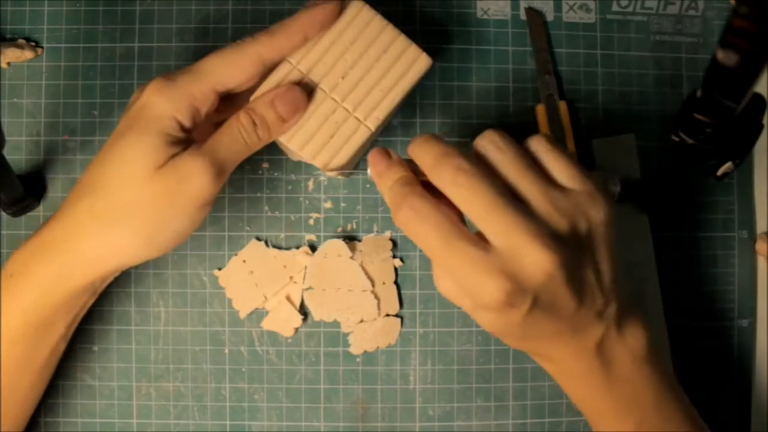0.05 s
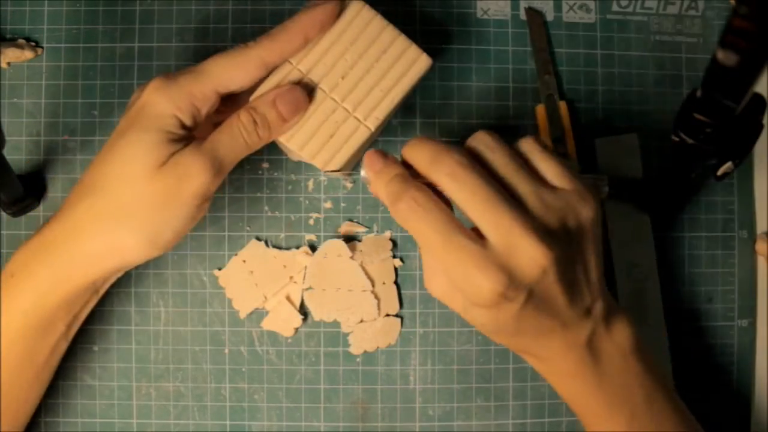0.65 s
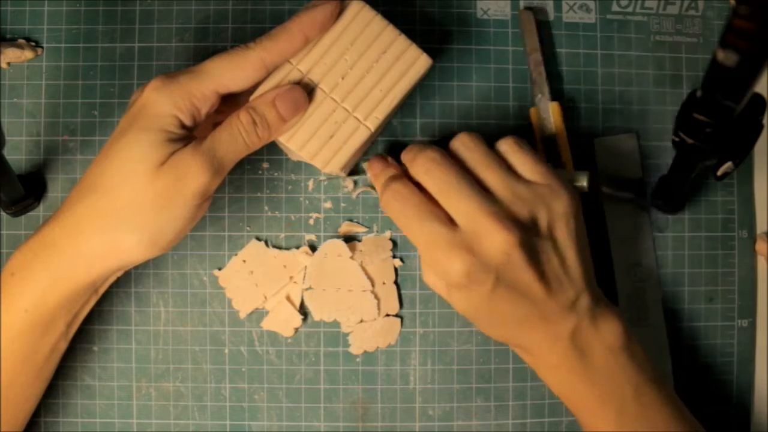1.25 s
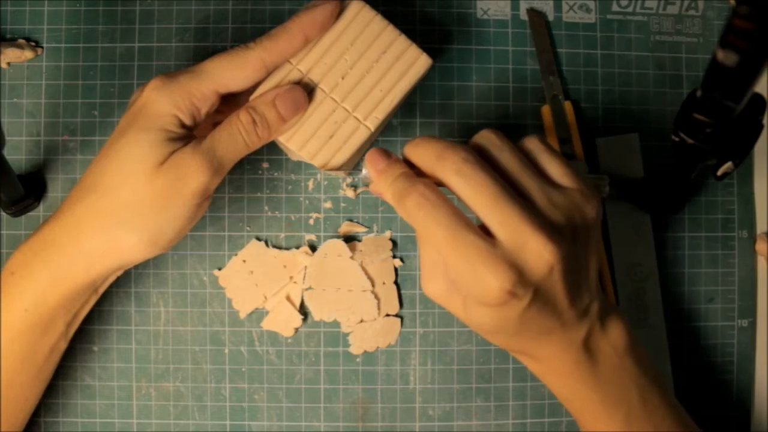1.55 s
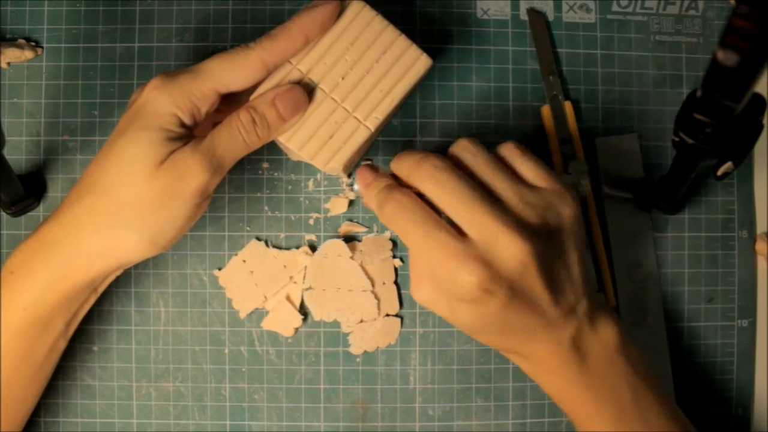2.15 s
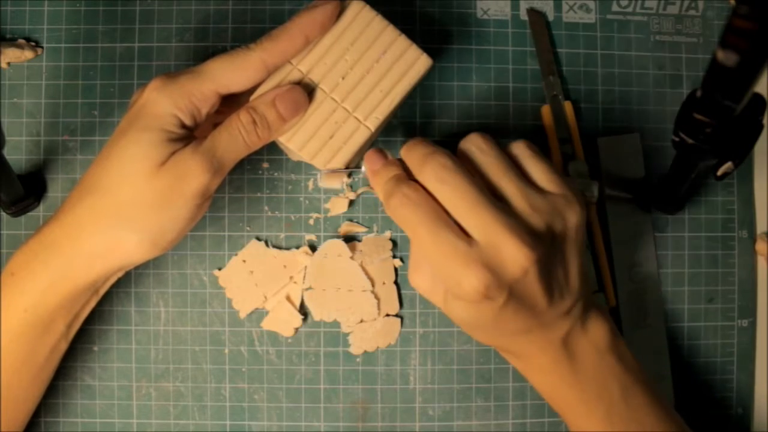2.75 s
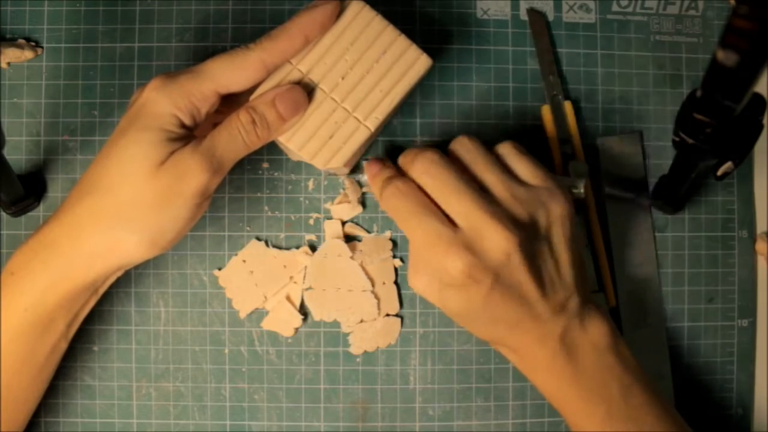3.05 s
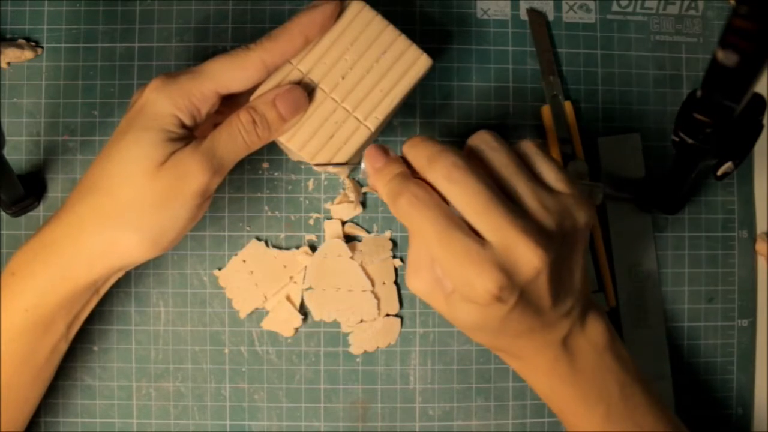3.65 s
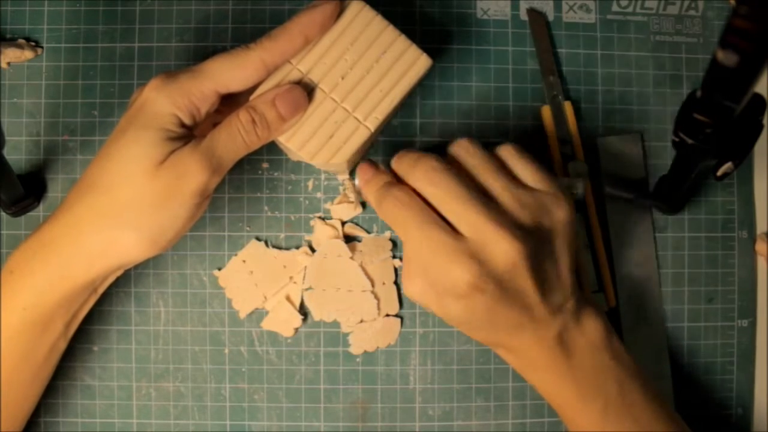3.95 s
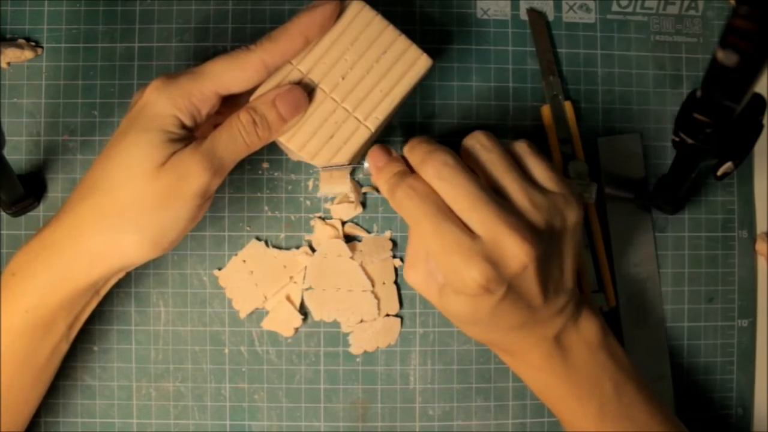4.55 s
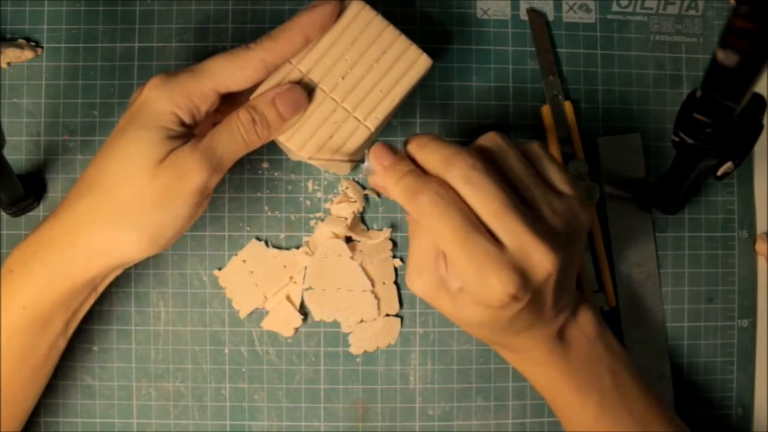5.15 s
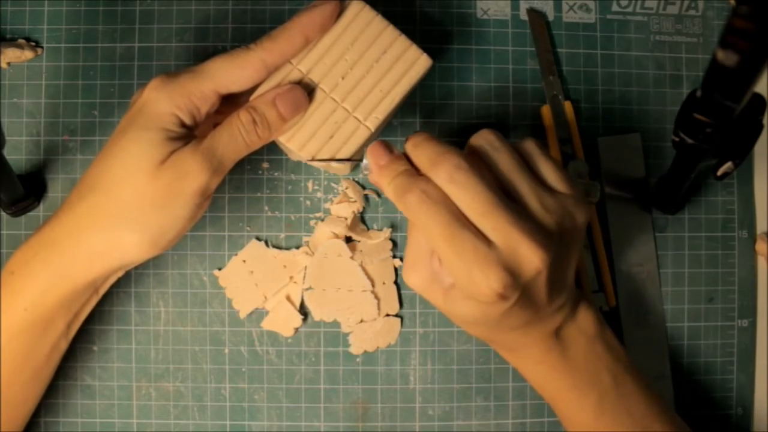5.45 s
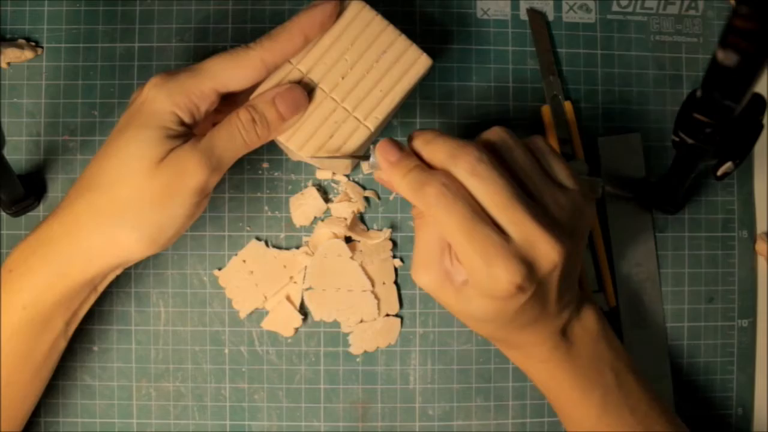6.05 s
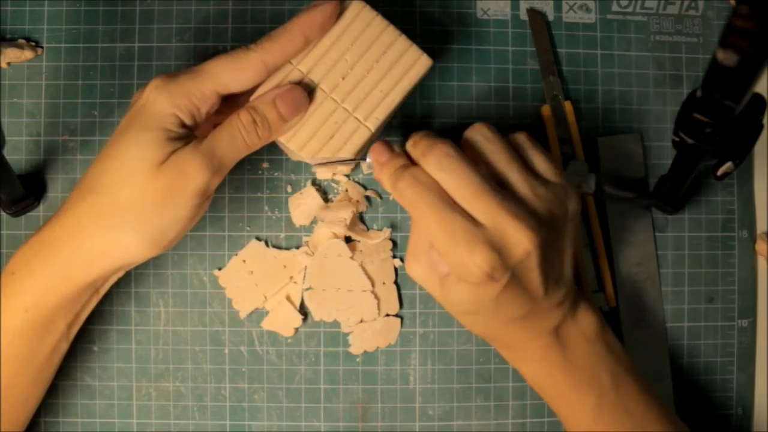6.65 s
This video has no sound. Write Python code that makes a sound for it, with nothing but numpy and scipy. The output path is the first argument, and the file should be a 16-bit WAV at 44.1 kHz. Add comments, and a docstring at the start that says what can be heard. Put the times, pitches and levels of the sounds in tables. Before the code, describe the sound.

A thin steel blade cuts crumbs off a block of dry clay in short, uneven strokes. Each bite gives a gritty scrape and a soft bump on the desk. Early on, a slice snaps off and the blade slips with a quick metallic chatter. More cuts follow, with two more sharp snaps and the dry ticks of breaking crumbs. The sound is close, in a small room with faint low noise.

```python
"""A thin steel blade slices crumbs off a block of dry clay on a cutting mat, in a small room.
The edge grates through grit and each bite bumps the block against the desk. Slices snap off,
the blade clacks down and crumbs tick. Once the blade catches and slips, chattering and ringing.
Desk modes and room reflections colour the work; room noise, hum and faint squeaks lie underneath."""
import sys
import numpy as np
from scipy import signal
from scipy.fft import rfft, irfft, next_fast_len
from scipy.io import wavfile
from scipy.ndimage import map_coordinates

SR = 44100
rng = np.random.default_rng(int(sys.argv[2]) if len(sys.argv) > 2 else 0)


def file_out(sig):
    """Save sig as 16-bit WAV at sys.argv[1]."""
    # one column per channel
    cols = np.atleast_2d(sig).T
    # limit, then scale
    lim = np.clip(cols, -1, 1)
    pcm = np.round(lim * 32767).astype(np.int16)
    wavfile.write(sys.argv[1], SR, pcm)


N = 303849
T = np.arange(SR // 8) / SR  # seconds within one contact

# Blade strokes. Each row: bite time, push before it and slide after it in seconds, bump in dB, bump pitch
# in Hz, bump width in cycles, rumble and grating in relative dB, edge hiss pitch in Hz.
STROKES = [ (0.2213, 0.024, 0.088, -26, 265, 0.4, -46.5, -61.5, 5850),
           (1.116, 0.03, 0.21, -30.5, 260, 0.51, -41, -58.5, 6200),
           (1.975, 0.0033, 0.056, -27.5, 217, 1.17, -40.5, -58, 6050),
           (2.762, 0.012, 0.008, -31, 278, 1.0, -42, -60.5, 6500),
           (2.9126, 0.0063, 0.11, -31.5, 360, 1, -44.5, -57, 6300),
           (3.470, 0.0039, .008, -35, 260, 0.84, -58, -71, 6500),
           (3.81, 0.0091, 0.042, -31.5, 282, 0.85, -38.5, -53.5, 6760),
           (4.4621, .001, 0.0034, -32.5, 290, 0.46, -46, -62, 6600),
           (4.653, 0.014, 0.011, -37, 258, 0.99, -43, -55.5, 6500),
           (4.688, 0.0069, 0.02, -28.5, 207, 1.3, -40.5, -56, 6500),
           (5.228, .003, .005, -50, 296, 1, -64, -66, 6500),
           (5.666, 0.014, 0.019, -30, 302, 1.4, -37.5, -54, 7600),
           (5.764, 0.026, 0.0054, -39.5, 322, 0.56, -47.5, -60, 6550),
           (5.846, 0.0067, 0.061, -36, 230, 0.82, -48.5, -52.5, 6300),
           (6.083, .003, 0.006, -39.5, 253, 0.8, -57, -66, 6500),
           (6.494, 0.014, 0.0047, -33.5, 280, 0.48, -48.5, -62, 7540),
           (6.787, 0.001, 0.0098, -35.5, 222, 0.7, -45.5, -62.5, 7900),
           (6.882, 0.0093, .01, -54, 260, 0.54, -51, -51.5, 6140), ]
# Slices breaking off. Each row: time in seconds, crack, clack and knock in dB, knock pitch in Hz, then
# 1.5 kHz hollow, woody ring, 7 kHz sheen and 11 kHz sparkle in dB.
SNAPS = [ (0.3488, 3, -7.5, -27, 398, 0, -39, -10, -11), (1.254, 16, 12.5, -15.5, 365, -7.5, -26, 7.5, 6),
         (2.993, 5, 14.5, -15.5, 420, -6, -26, 14, 3.5), (4.7115, 1, 13, -16.5, 337, -10, -27.5, 13, 13),
         (5.8848, -7.5, -5.5, -32, 357, -10, -51, 0, 1), ]
# Hard slips of the blade. Each row: time in seconds, rasp in relative dB, knock in dB.
SLIPS = [(1.4254, 10, -16), (1.429, 2.5, -32), (1.4341, 6.5, -26), (1.438, 6.5, -19), (1.4417, -3, -23.5),
         (1.452, 7.5, -16.5), (1.4610, 6, -34), (1.4673, 8.5, -24.5), (1.476, -2, -28), (1.488, 1.5, -27),
         (1.4940, -18, -25), (1.499, -7, -22), (1.5110, -14, -28.5), (1.5308, -0.5, -31.5),
         (1.542, -5.5, -42), (1.5476, -9, -41)]
# Blade modes. Each row: frequency in Hz, width in Hz, relative level in dB.
BLADE_MODES = [(3080, 110, 0), (3420, 110, -5), (3960, 220, -2), (4410, 60, -5), (4915, 75, -2),
               (5290, 50, -3), (5805, 50, 1), (6260, 45, -5), (6700, 160, -6), (7080, 40, -4),
               (7720, 24, -2), (7908, 32, 3), (8030, 38, 5), (8670, 60, -5), (9190, 30, -4),
               (10700, 60, -6), (12000, 100, -2), (13500, 130, -2)]


def cutting():
    """The edge grates through uneven grit, harder as it sinks in, while the block shudders and settles."""
    # Spectra of the grit and the block. Each row: frequency in Hz, relative level in dB.
    grit_spectrum = [(600, 7), (1400, 7), (2200, 0.5), (3100, 7.5), (3900, 9.5), (5000, -4.5), (6400, -2),
                     (8000, -6), (10000, -11.5), (16000, -10)]
    rumble_spectrum = [(60, -28), (130, -11), (210, -2), (330, -10), (520, -12), (750, -27), (1500, -66),
                       (4000, -64)]
    grains_per_s, grain_spread_db = 520, 4
    build_db_per_s, settle_db_per_s = 15, 49.5
    hiss_width_hz, hiss_gain_db = 1950, 8.5
    t = np.arange(N) / SR
    shudder, grate, hiss = np.zeros((3, N))
    grains = (rng.random(N) < grains_per_s / SR) * rng.standard_normal(N)
    grit = coloured(grains * amp(grain_spread_db * wobble(160)), grit_spectrum)
    for bite_s, push_s, slide_s, _, _, _, rumble_db, grate_db, edge_hz in STROKES:
        force = pressure(bite_s - push_s, bite_s + slide_s)
        shudder += amp(rumble_db - settle_db_per_s * np.maximum(t - bite_s, 0)) * force
        from_mid_slide_s = np.clip(t - bite_s - slide_s / 2, -slide_s, slide_s / 2)
        scrape = amp(grate_db + build_db_per_s * from_mid_slide_s) * force * grit
        grate += scrape
        hiss += signal.lfilter(*signal.iirpeak(edge_hz, edge_hz / hiss_width_hz, SR), scrape)
    rumble = shudder * amp(-1) * coloured(rng.standard_normal(N), rumble_spectrum)
    return rumble + grate + amp(hiss_gain_db) * hiss


def bumps():
    """At each bite the block hits the desk softly through the mat and rocks for a swing or two."""
    out = np.zeros(N)
    contact = amp(-8.5) * swing(hz=447, cycles=0.49)
    for bite_s, _, _, db, hz, cycles, *_ in STROKES:
        add(out, bite_s - T.mean(), amp(db) * (swing(hz, cycles) + contact))
    return out


def snaps():
    """Clay cracks into the pressed blade, which clacks down and knocks the desk. Gives (cracks, blows)."""
    # Modes of the pressed blade. Each row: frequency in Hz, width in Hz, gain in dB.
    pressed_modes = [(3970, 350, 8), (5200, 730, 1), (7430, 1500, -13)]
    # Blade landing on the mat. Each row: frequency in Hz, relative level in dB.
    clack_spectrum = [(200, -15.5), (330, 3.5), (500, 9), (750, 4.5), (1100, -1.5), (1850, -10.5),
                      (2200, -6.5), (2550, -12), (2900, -13), (3500, -12.5), (6000, -50), (12000, -69)]
    cracks, blows = np.zeros((2, N))
    for s, crack_db, clack_db, knock_db, knock_hz, hollow_db, _, sheen_db, sparkle_db in SNAPS:
        crack_spectrum = [(4000, 0), (7200, sheen_db), (11000, sparkle_db), (16000, sparkle_db - 2)]
        add(cracks, s, amp(crack_db) * click(crack_spectrum, life_s=0.01))
        add(blows, s, amp(clack_db) * click(sorted(clack_spectrum + [(1500, hollow_db)]), life_s=0.012))
        add(blows, s + 0.00124 - T.mean(), amp(knock_db) * swing(knock_hz, cycles=0.34))

    def pressed_blade(f):
        return sum((-1) ** k * amp(db) * resonance(f, hz, width_hz)
                   for k, (hz, width_hz, db) in enumerate(pressed_modes))
    return filtered(cracks, pressed_blade), blows


def woody_ring():
    """One woody note rings briefly under each snap."""
    hz, t60_s = 2110, 0.03
    out = np.zeros(N)
    for s, *_, ring_db, _, _ in SNAPS:
        add(out, s + 0.00099, amp(ring_db - 60 * T / t60_s) * np.sin(2 * np.pi * hz * T))
    return out


def crumb_ticks():
    """Crumbs break with dry clicks: a hollow body, a pitched edge and a little sparkle."""
    # Each row: time in seconds, edge pitch in Hz, then edge, body and sparkle in dB.
    ticks = [ (0.285, 4300, -12.5, -6.5, -42), (0.7102, 4100, 1, -8, -22), (0.9773, 3580, -9.5, -27, -62),
             (1.0804, 2150, 5, -6, -43), (1.0851, 2820, -0.5, -7, -41), (1.153, 4200, -3, -6, -38),
             (1.229, 5800, -3, -9, -2.5), (1.236, 5800, -4, -11, -18), (1.3344, 4430, 8, 6, -14),
             (2.911, 3900, -12, -12, -33.5), (3.097, 5000, 7, 6, -9), (3.099, 3640, -8, 4, -26.5),
             (3.8551, 6000, -6, -10, -19), (3.858, 3600, -8, -5, -28), (4.459, 3900, -11.5, -21, -21),
             (5.204, 4500, -7.5, -33, -32), (5.9007, 5500, -12, -6.5, -19.5), (6.49, 3900, -17, -34, -23),
             (6.6347, 4300, -2.5, -21, -36.5), (6.655, 4670, -2.5, -13.5, -23),
             (6.784, 5840, -9.5, -20, -28), ]
    out = np.zeros(N)
    for s, hz, edge_db, body_db, sparkle_db in ticks:
        body = [(200, body_db - 18), (hz / 3, body_db), (hz / 2, body_db - 3)]
        edge = [(hz, edge_db), (hz * 1.38, edge_db - 5)]
        sparkle = [(10000, sparkle_db), (16000, sparkle_db - 15)]
        add(out, s, click(body + edge + sparkle, life_s=0.013))
    return out


def chatter():
    """A quick run of slips, each trailing fine crackle, rings the blade and knocks the desk."""
    # Spectrum of one slip. Each row: frequency in Hz, relative level in dB.
    rasp_spectrum = [(600, -3), (1400, -10.5), (2200, -6), (3000, -4.5), (4200, -1), (8000, -4),
                     (10000, -7), (13000, -6), (16000, -15)]
    grains_per_s, crackle_t60_s = 4000, 0.055
    out = np.zeros(N)
    for s, rasp_db, knock_db in SLIPS + weak_slips():
        grains = (rng.random(len(T)) < grains_per_s / SR) * rng.standard_normal(len(T))
        crackle = coloured(grains * amp(-60 * T / crackle_t60_s), rasp_spectrum)
        rasp = amp(rasp_db) * (click(rasp_spectrum, life_s=0.0068) + amp(-47.5) * crackle)
        ring = signal.fftconvolve(rasp, blade_ring())[:len(T)]
        add(out, s, amp(-2.5) * rasp + amp(5.5) * ring)
        add(out, s + 0.0017 - T.mean(), amp(knock_db) * swing(hz=428, cycles=0.88))
    return out


def weak_slips():
    """Uneven slips among the hard ones, fading as the blade settles. Rows as in SLIPS."""
    length_s, slips_per_s, jitter = 0.1, 260, 0.3
    rasp_db, knock_db, fade_db_per_s, spread_db = -1.5, -35, 91, 3.5
    timing, strength = rng.standard_normal((60, 2)).T
    delays_s = (np.arange(len(timing)) + 1 + jitter * timing) / slips_per_s
    changes_db = spread_db * strength - fade_db_per_s * delays_s
    return [(SLIPS[0][0] + delay_s, rasp_db + db, knock_db + db)
            for delay_s, db in zip(delays_s, changes_db) if delay_s < length_s]


def blade_ring():
    """One ring of the blade: every slip bends it a little and strikes it at another spot."""
    detune, spread_db = 0.0015, 3
    hz, width_hz, db = np.transpose(BLADE_MODES)[:, :, None]
    bend, strike = rng.standard_normal((2, len(BLADE_MODES), 1))
    modes = np.exp(-np.pi * width_hz * T) * np.cos(2 * np.pi * hz * (1 + detune * bend) * T)
    return np.sum(amp(db + spread_db * strike) * 2 * np.pi * width_hz / SR * modes, axis=0)


def blade_screech():
    """Late in the chatter the steel rubs without catching and its modes swell into a short screech."""
    peak_s, sigma_s, peak_db, narrowing = 1.496, 0.013, -35.5, 0.65

    def free_blade(f):
        return sum(amp(db) * resonance(f, hz, narrowing * width_hz) for hz, width_hz, db in BLADE_MODES)
    swell = np.exp(-((np.arange(N) / SR - peak_s) / sigma_s) ** 2 / 2)
    return amp(peak_db) * swell * unit(filtered(rng.standard_normal(N), free_blade))


def desk(x):
    """The desk top rings on at its low modes."""
    # Each row: frequency in Hz, T60 in seconds, gain in dB.
    modes = [(114.8, 0.65, 4), (167, 0.95, -5), (229.5, 0.46, 6), (279.5, 0.44, 8), (343.64, 0.37, 5.5),
             (385, 0.18, -0.5), (428, 0.58, -2), (445, 0.97, -4.5), (510.5, 0.39, 2), (546, 0.49, 2.5),
             (589, 0.75, 1), (670, 0.61, 0), (782, 0.24, 10.5), (870, 0.27, 6.5)]
    return filtered(x, lambda f: sum(amp(db) * resonance(f, hz, np.log(1000) / np.pi / t60_s)
                                     for hz, t60_s, db in modes))


def room(x):
    """Diffuse room reflections, lows dying last; a fresh random tail every half second."""
    # Room decay. Each row: frequency in Hz, T60 in seconds.
    decay = [(150, 0.58), (600, 0.28), (2000, 0.39), (4000, 0.41), (7000, 0.36), (9000, 0.3), (15000, 0.33)]
    # Wall reflections. Each row: frequency in Hz, relative level in dB.
    wall_spectrum = [(60, -3), (200, -4), (700, -1.5), (1600, 6.5), (2200, 0.5), (3100, 0.5), (4200, -4),
                     (8000, 2), (11000, -6), (15000, -9.5)]
    block, onset_s = SR // 2, 0.00085
    out = np.zeros(N)
    for start in range(0, N, block):
        hz, t, noise = signal.stft(rng.standard_normal(block), SR, nperseg=256)
        tail_db = along(wall_spectrum, hz)[:, None] - 60 * t / along(decay, hz)[:, None]
        _, tail = signal.istft(noise * amp(tail_db), SR, nperseg=256)
        tail *= 1 - np.exp(-np.arange(len(tail)) / SR / onset_s)
        add(out, start / SR, signal.fftconvolve(x[start:start + block], tail / np.linalg.norm(tail)))
    return out


def squeaks():
    """Faint thin tones glide, waver and break up as they swell and fade."""
    # One curve per squeak. Each row: time in seconds, pitch in Hz, level in dB.
    glides = [
        [(3.55, 3040, -80), (3.572, 3100, -69), (3.6, 3300, -63), (3.632, 3510, -64), (3.66, 3400, -66),
         (3.69, 3750, -67), (3.74, 3930, -69)],
        [(5.15, 643, -72), (5.29, 698, -58), (5.45, 800, -67)],
        [(5.76, 1564, -64), (5.83, 1592, -57), (5.93, 1508, -65), (6.01, 1570, -53), (6.08, 1550, -55.5),
         (6.11, 1580, -62), (6.22, 1564, -67)],
    ]
    roughness, wander, flutter_db = 0.024, 0.006, 2.2
    out = np.zeros(N)
    for rows in glides:
        waver = 1 + roughness * wobble(350) + wander * wobble(25)
        level = amp(curve(rows, column=2) + flutter_db * wobble(110)) * pressure(rows[0][0], rows[-1][0])
        out += level * tone(curve(rows, column=1) * waver)
    return out


def room_noise():
    """Faint, mostly low noise with a slightly unsteady level."""
    # Each row: frequency in Hz, relative level in dB.
    spectrum = [(15, -40), (25, -56), (49, 0.5), (70, -0.5), (87, -7.5), (123, -15), (149, -6), (285, -1.5),
                (394, -4), (427, -2), (775, -4.5), (1260, -11), (2480, -14), (14800, -30), (16000, -28)]
    # Each row: time in seconds, level in dB.
    levels = [(0.0, -52), (0.5, -51.5), (2.0, -50), (3.3, -52.5), (5.3, -52), (6.89, -51.5)]
    return amp(curve(levels, column=1) + 1.3 * wobble(10)) * coloured(rng.standard_normal(N), spectrum)


def hum():
    """Two low tones waver in level and pitch."""
    # Each row: frequency in Hz, level in dB.
    partials = [(58, -73.5), (114, -69.5)]
    return sum(amp(db + 1.7 * wobble(2.8)) * tone(hz + 2.67 * wobble(30.07)) for hz, db in partials)


def pressure(start_s, end_s):
    """Friction gain: builds up to start_s, holds, lets go after end_s."""
    attack_db_per_s, release_db_per_s = 439, 560
    t = np.arange(N) / SR
    return amp(-attack_db_per_s * np.maximum(start_s - t, 0) - release_db_per_s * np.maximum(t - end_s, 0))


def click(spectrum, life_s):
    """A fracture: tiny pulses build and die within life_s, evened toward a (Hz, dB) spectrum."""
    burst = rfft(rng.standard_normal(len(T)) * T * amp(-90 * T / life_s))
    burst /= np.sqrt(np.mean(abs(burst) ** 2))
    gain = amp(along(spectrum, np.fft.rfftfreq(len(T), 1 / SR))) / (abs(burst) + 0.5)
    cepstrum = irfft(np.log(gain))
    cepstrum[1:] *= 2 * (np.arange(1, len(cepstrum)) < len(cepstrum) // 2)  # nothing before the blow
    return irfft(burst * np.exp(rfft(cepstrum)))


def swing(hz, cycles):
    """A short swing of the mat: a sine under a Gaussian, centred in T."""
    turns = (T - T.mean()) * hz
    return np.exp(-(turns / cycles) ** 2) * np.sin(2 * np.pi * turns)


def resonance(f, centre_hz, width_hz):
    """Response of one mode at frequencies f."""
    return 1j * f * width_hz / (centre_hz ** 2 - f ** 2 + 1j * f * width_hz)


def tone(hz):
    """A sine of rms 1 on a pitch curve."""
    return np.sqrt(2) * np.sin(2 * np.pi * np.cumsum(hz) / SR)


def amp(db):
    """Decibels to gain."""
    return 10 ** (np.asarray(db) / 20)


def unit(x):
    """Scale to rms 1."""
    return x / np.sqrt(np.mean(x ** 2) + 1e-20)


def along(points, hz):
    """Read (Hz, value) points on a log axis."""
    f, values = np.transpose(points)
    return np.interp(np.log(hz + 1), np.log(f), values)


def curve(rows, column):
    """One column of a timed table, per sample."""
    rows = np.asarray(rows)
    return np.interp(np.arange(N) / SR, rows[:, 0], rows[:, column])


def wobble(knots_per_s):
    """A smooth random curve."""
    knots = rng.standard_normal(int(N * knots_per_s / SR) + 4)
    return map_coordinates(knots, [np.arange(N) * knots_per_s / SR])


def filtered(x, response):
    """x through a frequency response."""
    size = next_fast_len(len(x) + SR // 2)
    return irfft(rfft(x, size) * response(np.fft.rfftfreq(size, 1 / SR)), size)[:len(x)]


def coloured(x, spectrum):
    """x shaped by a (Hz, dB) spectrum, at rms 1."""
    return unit(filtered(x, lambda hz: amp(along(spectrum, hz))))


def add(track, start_s, sound):
    """Mix a sound into the track."""
    part = track[round(start_s * SR):][:len(sound)]
    part += sound[:len(part)]


def scene():
    """The work on the mat, direct and through desk and room, over the background. Mono."""
    strokes = bumps() + cutting()
    cracks, blows = snaps()
    crumbs = crumb_ticks()
    blade = chatter() + blade_screech()
    direct = strokes + cracks + blows + woody_ring() + crumbs + blade
    echo = room(amp(-2) * strokes + amp(-7) * cracks + blows + amp(-8) * crumbs + amp(-11.5) * blade)
    desk_ring = desk(amp(-0.5) * strokes + amp(1.5) * blows + amp(-4) * blade)
    low_cut = signal.butter(2, 80, "high", fs=SR, output="sos")  # small things radiate little bass
    work = signal.sosfilt(low_cut, direct + desk_ring + echo)
    return (work + room_noise() + hum() + squeaks())[None]


def record(dry):
    """Band limit at 16 kHz."""
    return np.array([filtered(x, lambda hz: hz < 16000) for x in dry])


dry = scene()
out = record(dry)
file_out(out)
```